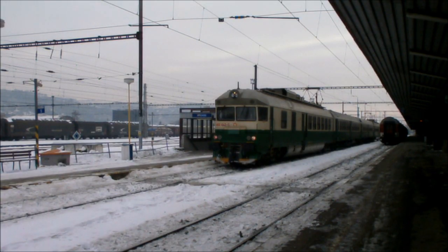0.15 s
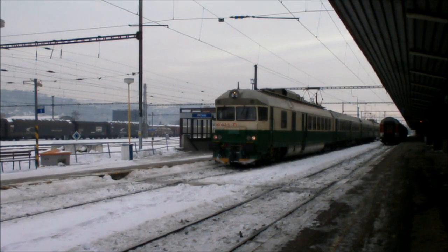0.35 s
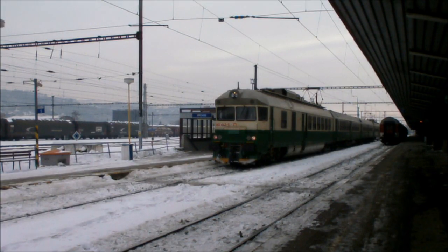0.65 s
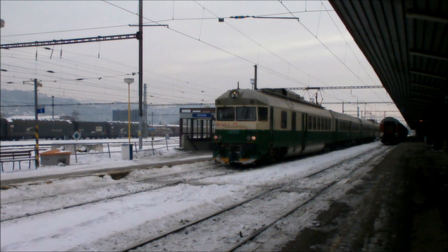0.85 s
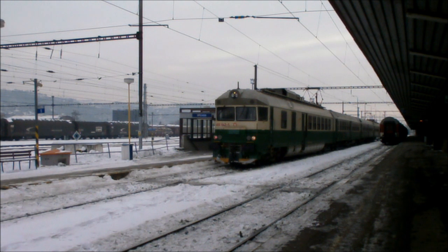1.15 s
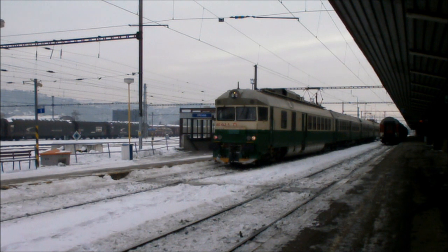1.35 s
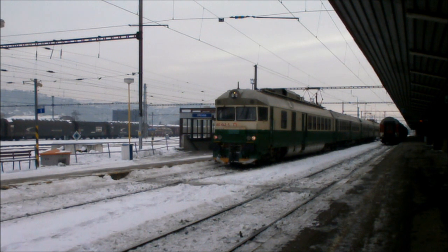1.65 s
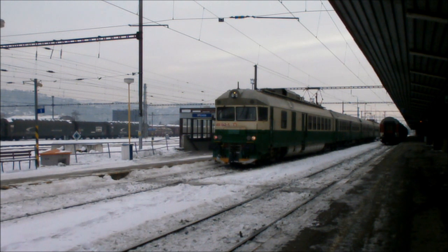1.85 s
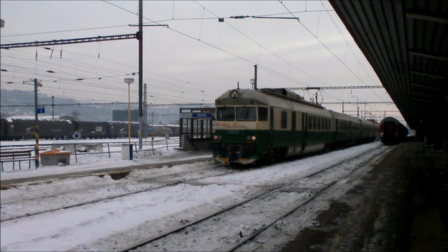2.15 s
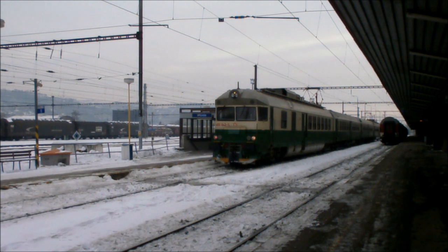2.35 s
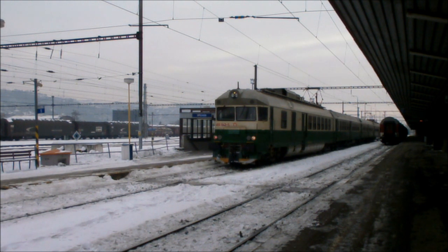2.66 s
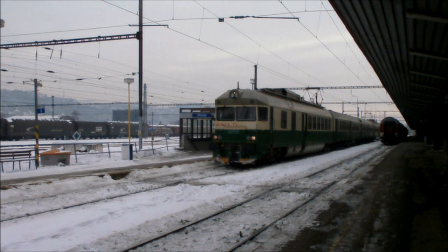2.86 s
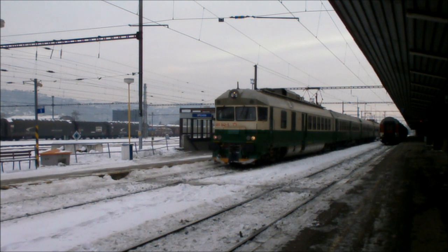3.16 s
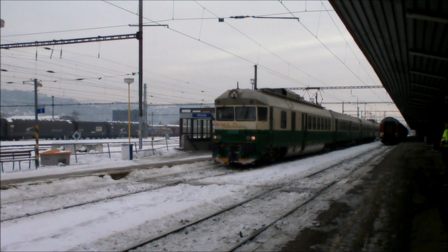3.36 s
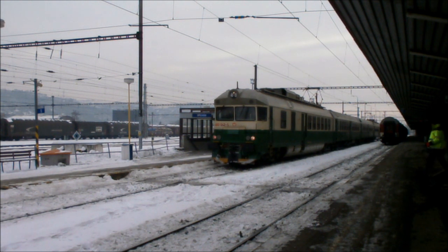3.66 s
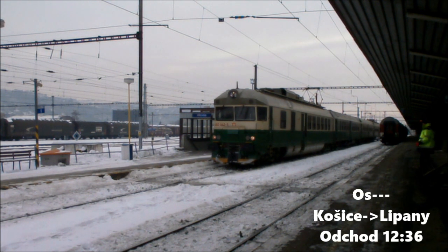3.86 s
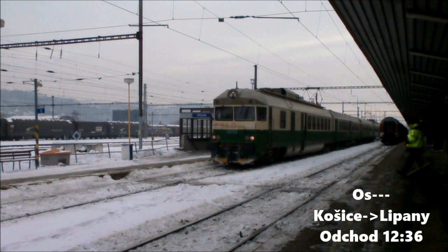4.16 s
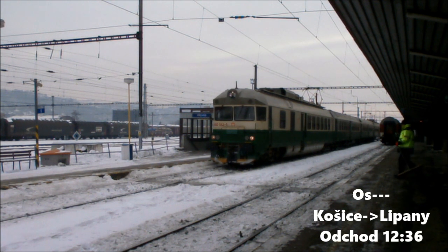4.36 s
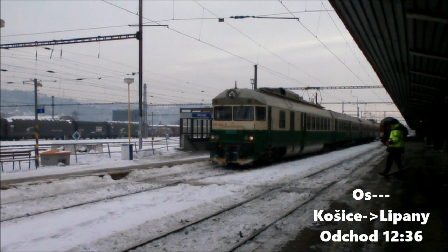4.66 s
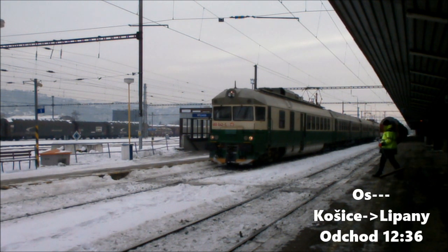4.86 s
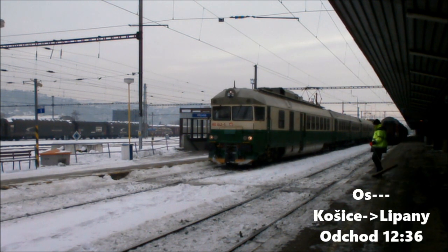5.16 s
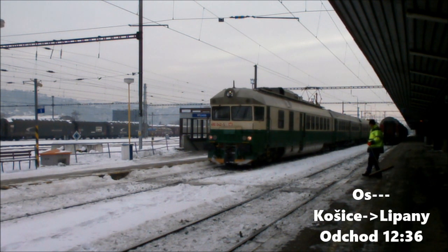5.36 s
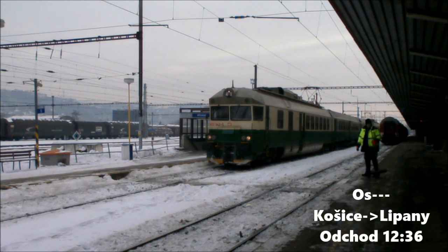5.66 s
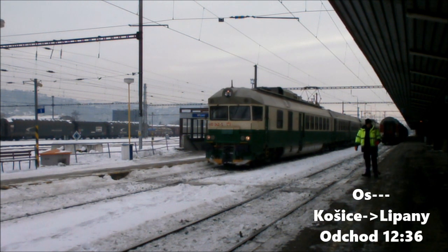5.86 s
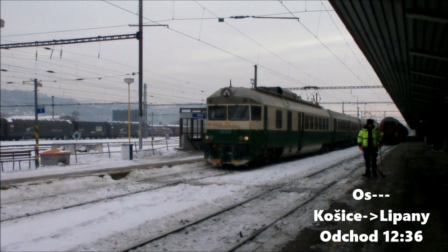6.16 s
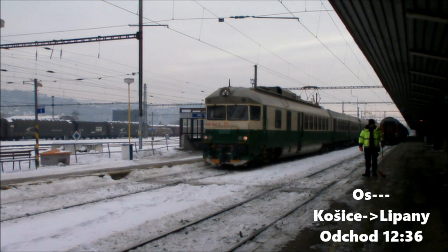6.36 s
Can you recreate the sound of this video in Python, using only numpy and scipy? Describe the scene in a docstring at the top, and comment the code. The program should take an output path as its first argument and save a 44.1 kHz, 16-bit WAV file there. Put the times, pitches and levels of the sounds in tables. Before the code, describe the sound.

A standing electric train's blower sings one constant, slightly trembling tone amid airy duct roar, while feet lightly crunch and scuff snow near the microphone.

```python
"""The 18-blade cooling fan of an electric train at a snowy platform sings a fluttering whine.
Blade passing gives sine tones; air rushing through ducts and louvres is noise with resonances.
Snow crunches softly close by, made of filtered bursts of unequal grains.
Other machines hum faintly, and the camera adds a thin, high whistle of its own."""
import sys
import numpy as np
from scipy import signal
from scipy.fft import rfft, irfft
from scipy.io import wavfile

SR = 44100
rng = np.random.default_rng(int(sys.argv[2]) if len(sys.argv) > 2 else 0)


def master_out(mix):
    """Clip the mix to full scale and print it as 16-bit PCM to the path in sys.argv[1]."""
    frames = np.transpose(np.atleast_2d(mix))
    ceiling = np.clip(frames, -1, 1)
    pcm = np.round(ceiling * 32767).astype(np.int16)
    wavfile.write(sys.argv[1], SR, pcm)


N = 286650
T = np.arange(N) / SR  # time [s]
BINS = np.maximum(np.arange(N // 2 + 1) * SR / N, 1)  # frequency [Hz], kept above zero


def undb(db):
    """Amplitude ratio: 20 dB make a factor of ten."""
    return 10 ** (np.asarray(db) / 20)


def curve(rows):
    """Linear interpolation: rows of (time [s], value) joined by straight lines."""
    return np.interp(T, *np.transpose(rows))


def colour(points):
    """Spectral envelope: gain from (frequency [Hz], level [dB]), straight over log frequency."""
    hz, db = np.transpose(points)
    return undb(np.interp(np.log(BINS), np.log(hz), db))


def resonance(hz, width):
    """Resonance: a steep-sided gain that is 1 at its centre."""
    detuning = (BINS ** 2 - hz ** 2) / (BINS * width * np.sqrt(2))
    return 1 / (1 + detuning ** 2)


def shape(x, gain):
    """Linear filtering: each frequency is multiplied by its gain."""
    return irfft(rfft(x) * gain, N)


def unit(x):
    """Normalization: scale to a standard deviation of 1."""
    return x / np.std(x)


def turbulence(gain):
    """Turbulent noise: random pressure whose amplitude density per root Hz follows the gain."""
    return shape(rng.standard_normal(N), gain) * np.sqrt(SR / 2)


def walk(hz):
    """Slow random modulation: low-passed noise of spread 1, mostly below the given rate."""
    return unit(turbulence(1 / (1 + (BINS / hz) ** 4)))


def fan(shaft_flutter=0.43, octave_flutter=0.32):
    """Blade-passing tone: blades sing past the housing; an uneven rotor adds shaft-rate multiples."""
    blades = 18
    # Blade-passing rate: (time [s], frequency [Hz])
    blade_rate = [(0, 862.2), (2.3, 861.7), (3.2, 859.0), (3.9, 858.9), (5.1, 862.0), (6.5, 860.0)]
    # Strength of the whine as the air carries it over: (time [s], mean rms level [dB])
    whine_level = [(0, -23.5), (1.5, -23.5), (2.3, -22.5), (3.2, -26), (4.15, -23), (4.65, -22.5),
                   (5.5, -26), (6.5, -26)]
    # Tones of the slightly uneven rotor: (multiple of the shaft rate, mean rms level [dB])
    shaft_tones = [(4, -58), (6, -57.5), (11, -60.5), (17, -51), (19, -52), (20, -54.5), (21, -48.5),
                   (22, -51.5), (54, -69.5)]

    angle = 2 * np.pi * np.cumsum(curve(blade_rate)) / SR
    # uneven inflow shakes the strength of the whine while its pitch stays true
    flutter = 0.115 * walk(26)
    throb = 0.055 * np.sin(2 * np.pi * 16.7 * T)
    out = undb(curve(whine_level)) * (1 + flutter + throb) * np.sin(angle)

    # the second harmonic flutters about a steady level, but for one 6 dB swell
    swell = np.exp(-((T - 5.7) / 0.74) ** 2)
    octave_level = undb(-55 + 6 * swell)
    out += octave_level * (1 + octave_flutter * walk(7.8)) * np.sin(2 * angle)

    for multiple, db in shaft_tones:
        strength = undb(db) * (1 + shaft_flutter * walk(3.4))
        phase = rng.uniform(0, 2 * np.pi)
        out += strength * np.sin(angle * multiple / blades + phase)
    return np.sqrt(2) * out  # sine amplitude from rms


def air(swell_db=0.78, flicker_db=1.0):
    """Resonant flow noise: rushing cooling air rings the ducts, each resonance flickering alone."""
    # Broad rush of the cooling air: (frequency [Hz], mean density [dB per Hz])
    rush = [(12, -90), (42, -71.5), (65, -72), (115, -75.5), (300, -69.5), (560, -66), (1080, -68.5),
            (1480, -77.5), (2330, -79), (2700, -76), (3550, -79), (5000, -90), (6800, -90.5), (12000, -100),
            (15500, -101)]
    # Duct and louvre resonances: (frequency [Hz], width [Hz], mean density at the centre [dB per Hz])
    ducts = [(388, 45, -65.5), (449, 68, -65), (731, 39, -58.5), (791, 82, -58), (872.6, 42, -55),
             (936, 57, -56.5), (994, 97, -61), (1240, 89, -77), (1721, 135, -70.5), (2046, 200, -73.5),
             (2490, 200, -80.5)]

    out = turbulence(colour(rush))
    for hz, width, db in ducts:
        ringing = turbulence(undb(db) * resonance(hz, width))
        out += ringing * undb(flicker_db * walk(5.5))
    return out * undb(swell_db * walk(1.35))


def snow(rise_s=0.002, ring_width=800, tail_db=-17, tail_t60=0.76, uneven_db=2.0):
    """Granular fracture: soles scuff and crush snow; a slower decay is the platform roof's tail."""
    # Crunches in the snow: (time [s], level relative to the other crunches and scuffs [dB],
    # brightest frequency [Hz], lowest frequency [Hz], emphasis of the brightest band [dB])
    crunches = [(.006, -33, 6200, 2960, -7), (.078, -36.5, 7400, 2000, 1), (.264, -48, 6600, 4800, -4),
                (.602, -33.5, 6050, 4700, 1), (.714, -35.5, 5670, 2500, 8), (0.715, -37, 3700, 3400, 24),
                (0.731, -33, 6500, 2470, 8), (1.323, -47, 5500, 4900, -2), (1.645, -50, 6400, 5600, 1),
                (1.812, -44, 6400, 5200, 7), (1.859, -50, 6000, 5000, -6), (2.417, -45.5, 7200, 4800, 4),
                (3.564, -48, 9200, 5200, 2), (4.445, -52, 6800, 6000, 8), (6.105, -46, 7000, 6200, 12)]
    # Colour of the crushed grains: (frequency [Hz], relative level [dB])
    grain_spectrum = [(500, -2), (1800, 6.5), (3800, 0.5), (5200, -1), (6600, -1), (8000, -4), (11000, -13),
                      (15500, -11)]
    # a firm step breaks the crust at once, a light one crumbles for longer
    light_db, light_t60_s, firm_db, firm_t60_s = -47, 0.15, -28, 0.087

    grain_colour = colour(grain_spectrum)
    rubbing = unit(shape(grains(scatter_db=1.7), grain_colour))
    out = rubbing * scuffing() * undb(uneven_db * walk(23))
    for start, db, hz, lowest_hz, ring_db in crunches:
        t60 = np.interp(db, [light_db, firm_db], [light_t60_s, firm_t60_s])
        age = np.maximum(T - start, 0)
        rise = np.minimum(age / rise_s, 1)
        # a fall by a factor of 1000 is 60 dB
        direct = np.exp(-np.log(1000) * age / t60)
        tail = undb(tail_db) * np.exp(-np.log(1000) * age / tail_t60)
        # fine grains lack the lower tones
        fineness = 1 / (1 + (lowest_hz / BINS) ** 16)
        ring = 1 + undb(ring_db) * resonance(hz, ring_width)
        crack = shape(grains(scatter_db=2.5), grain_colour * fineness * ring)
        out += undb(db) * rise * (direct + tail) * unit(crack)
    return out


def grains(scatter_db=3.0):
    """Granular noise: dense cracks, 12 samples each, of very unequal size."""
    size = np.repeat(rng.exponential(size=N), 12)[:N]
    return rng.standard_normal(N) * undb(scatter_db * np.minimum(size, 5))


def scuffing():
    """Energy addition: single scuffs and a soft shuffle sum as squared strengths."""
    # Soles scuffing over snow: (start [s], length [s], level relative to the crunches and scuffs [dB])
    scuffs = [(0, 0.14, -41), (0.147, 0.15, -47), (0.577, 0.23, -46), (2.05, 0.49, -51),
              (3.534, 0.32, -48.5), (4.8, 0.26, -49), (5.7, 0.52, -54), (6.3, 0.16, -44)]
    # feet shift softly all the while, but for one pause in which the shuffle sinks by 13 dB
    shuffle = undb(-55.5 - 13 * stroke(start=2.9, length=1))
    power = shuffle ** 2
    for start, length, db in scuffs:
        power += (undb(db) * stroke(start, length)) ** 2
    return np.sqrt(power)


def stroke(start, length, swell=0.68, release_s=0.072):
    """Amplitude envelope: a swell over a share of the length, a hold and a quick release."""
    attack = np.clip((T - start) / (swell * length), 0, 1)
    release = np.clip(1 - (T - start - length) / release_s, 0, 1)
    return attack * release


def machines(waver=0.64):
    """Tonal hum: other motors on the train give faint sines of wavering strength."""
    # Hum of the auxiliary machines: (frequency [Hz], mean rms level [dB])
    hum = [(66, -63.5), (486.6, -52), (1262, -68)]
    out = np.zeros(N)
    for hz, db in hum:
        out += undb(db) * (1 + waver * walk(2.2)) * np.sin(2 * np.pi * hz * T)
    return np.sqrt(2) * out


def camera(whistle_db=-48.0, dip=0.52, duty=0.17):
    """Amplitude modulation: the camera's supply whistles, dipping at each sensor read-out."""
    whistle_hz, readout_hz = 14947, 56.9
    reading = (T * readout_hz) % 1 < duty
    level = undb(whistle_db) * (1 - dip * reading)  # rms
    return np.sqrt(2) * level * np.sin(2 * np.pi * whistle_hz * T)


def scene():
    """Superposition: the pressures of the train ahead and the snow close by add up."""
    train = fan() + air() + machines()
    return (train + undb(1.5) * snow())[None]


def record(dry):
    """Port resonance and band limit: the microphone port colours, the camera whistles, the top is cut."""
    # Dips and a peak of the microphone port: (frequency [Hz], width [Hz], gain [dB])
    port = [(4510, 580, -8), (7900, 640, -3), (10620, 530, 5)]
    port_db = sum(db / (1 + (2 * (BINS - hz) / width) ** 2) for hz, width, db in port)
    heard = shape(dry, undb(port_db)) + camera()
    # steep low-pass at 15720 Hz: 0.1 dB ripple, 80 dB rejection
    low_pass = signal.ellip(12, 0.1, 80, 15720, fs=SR, output="sos")
    return signal.sosfilt(low_pass, heard)


dry = scene()
out = record(dry)
master_out(out)
```